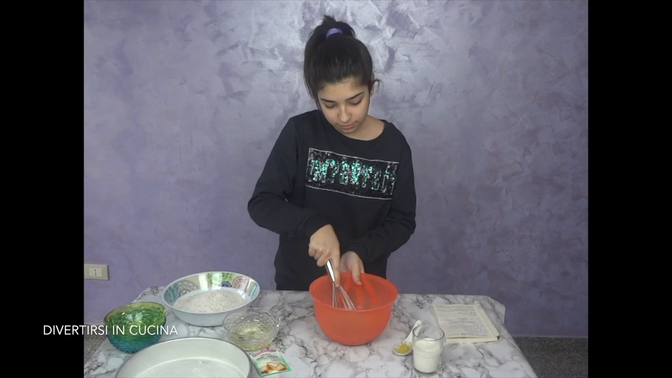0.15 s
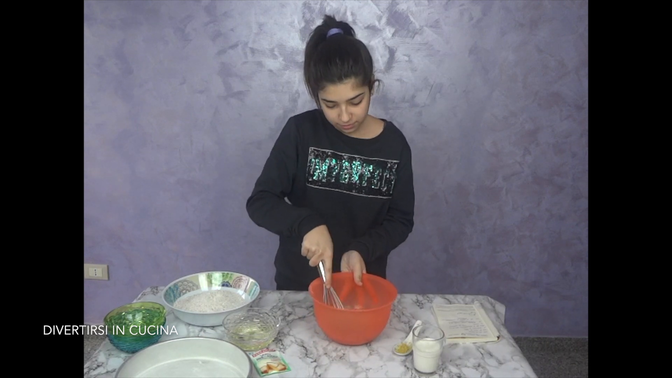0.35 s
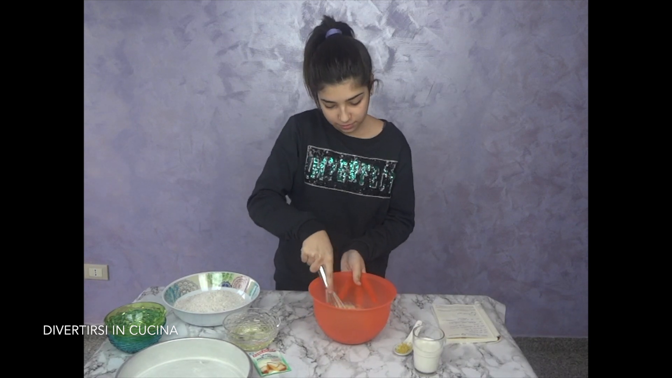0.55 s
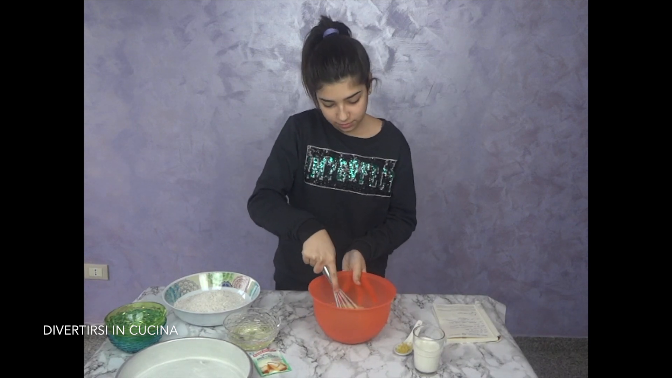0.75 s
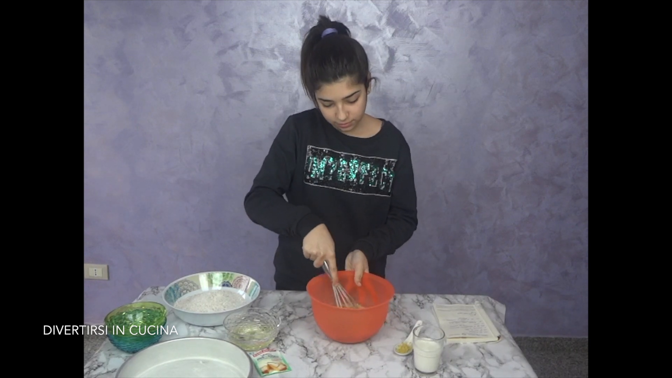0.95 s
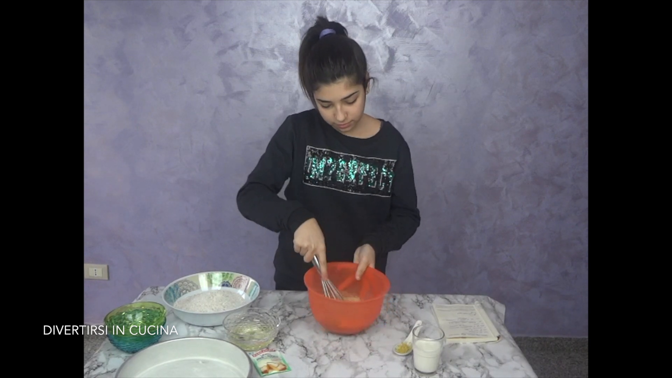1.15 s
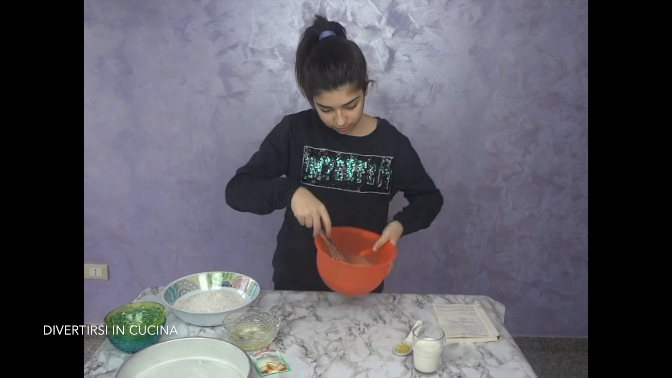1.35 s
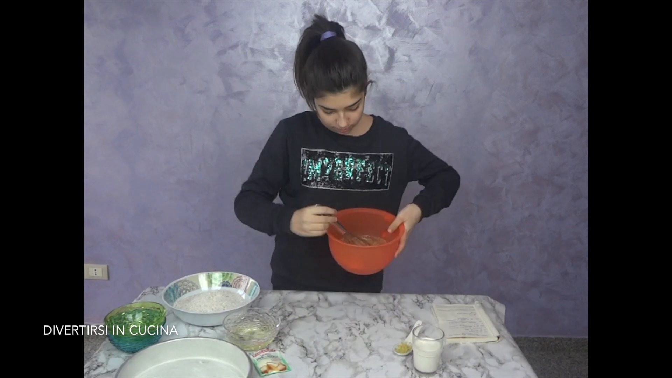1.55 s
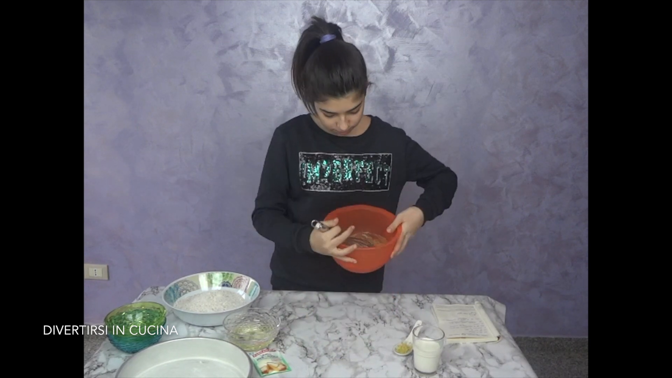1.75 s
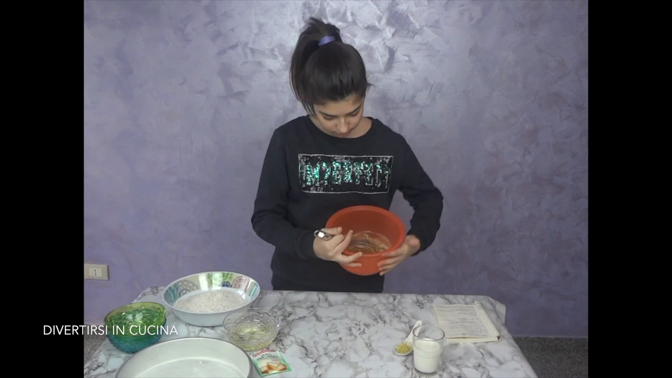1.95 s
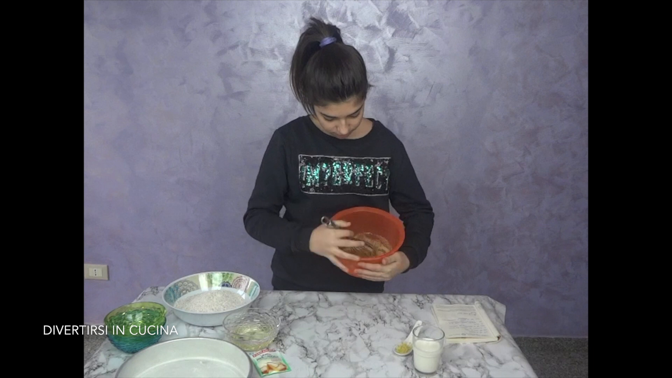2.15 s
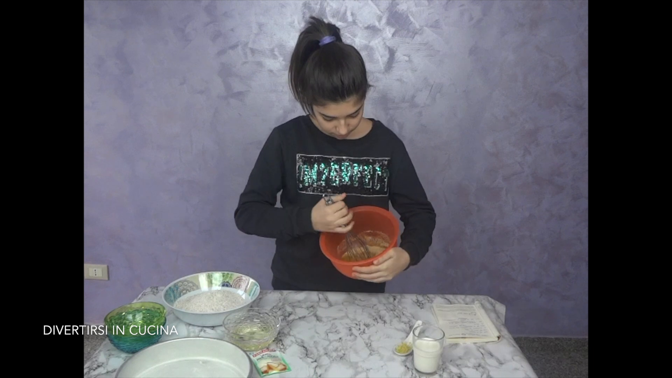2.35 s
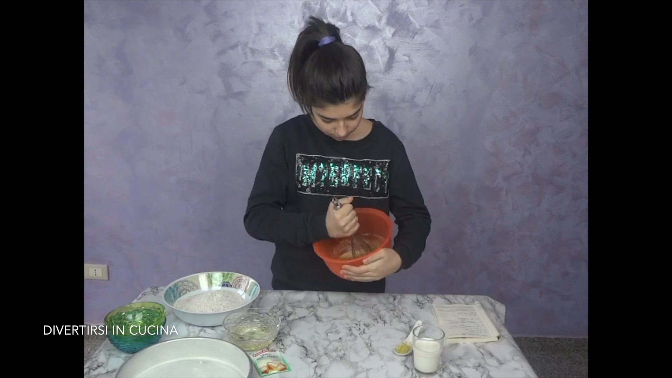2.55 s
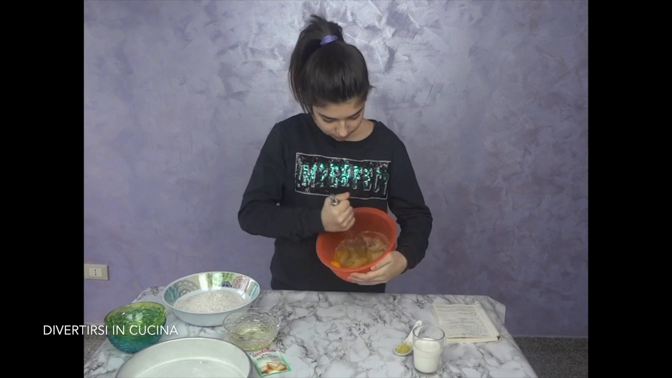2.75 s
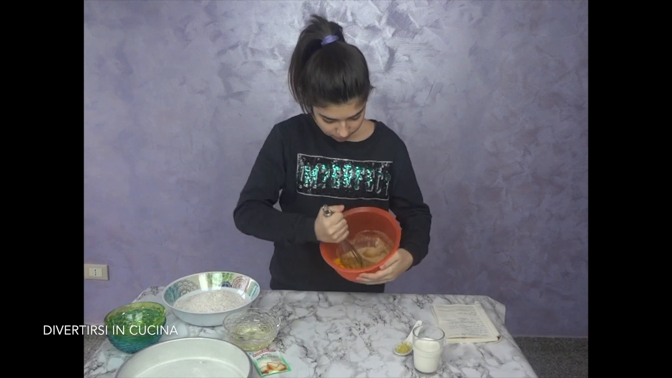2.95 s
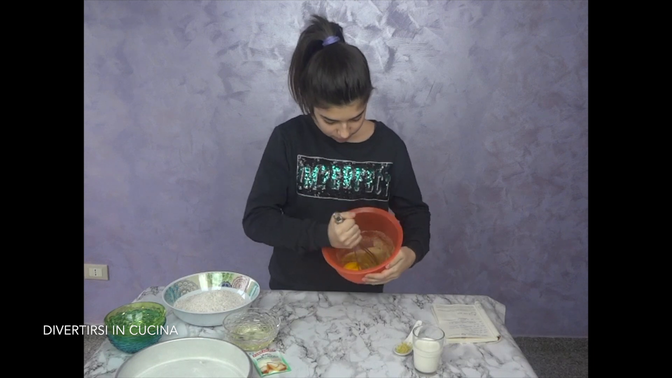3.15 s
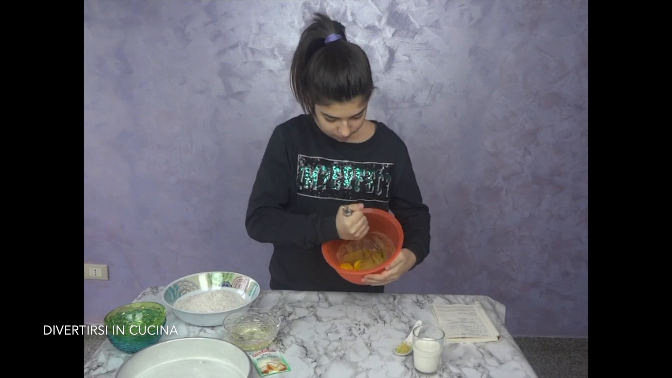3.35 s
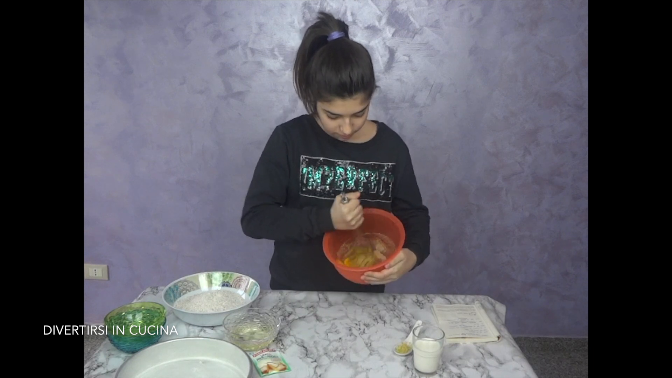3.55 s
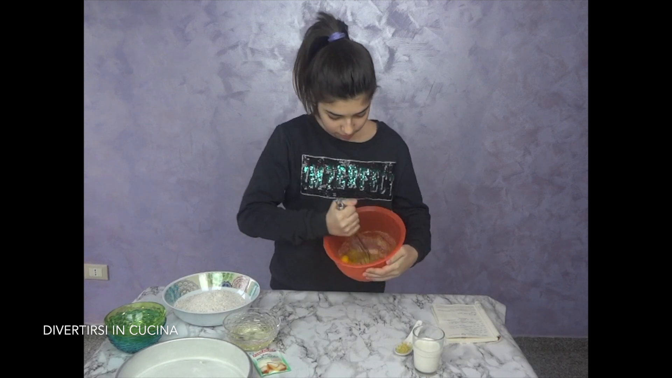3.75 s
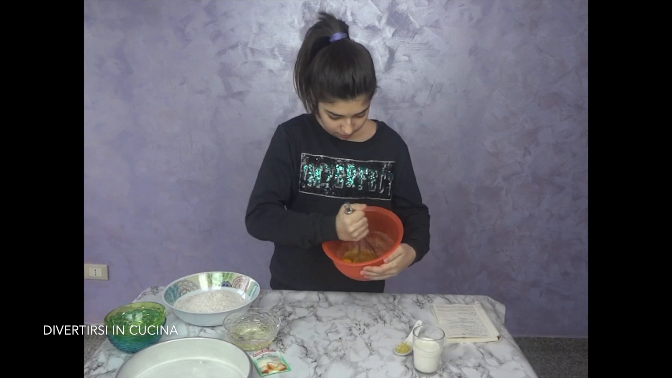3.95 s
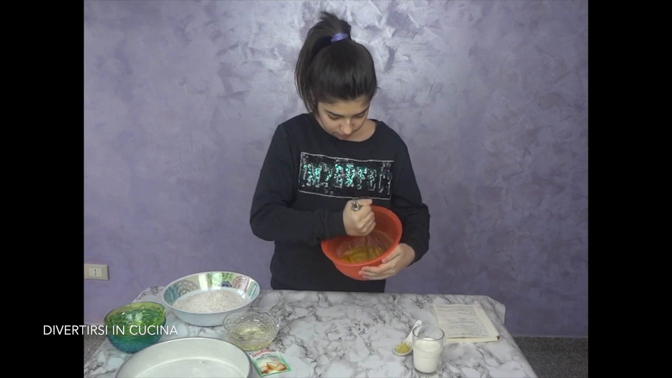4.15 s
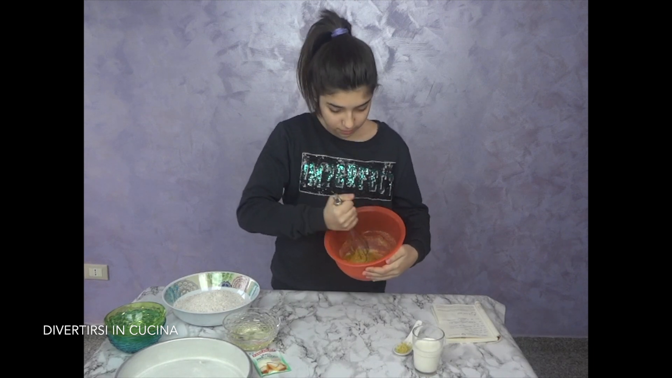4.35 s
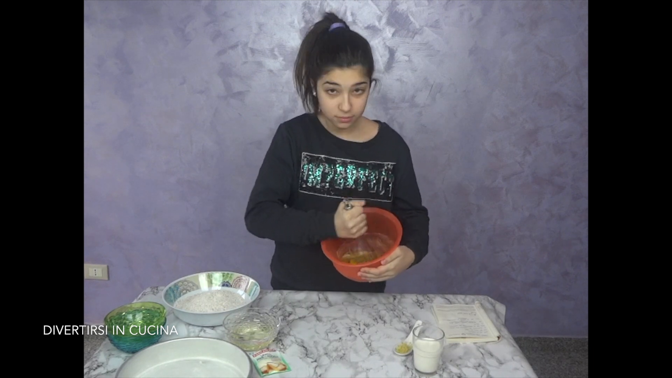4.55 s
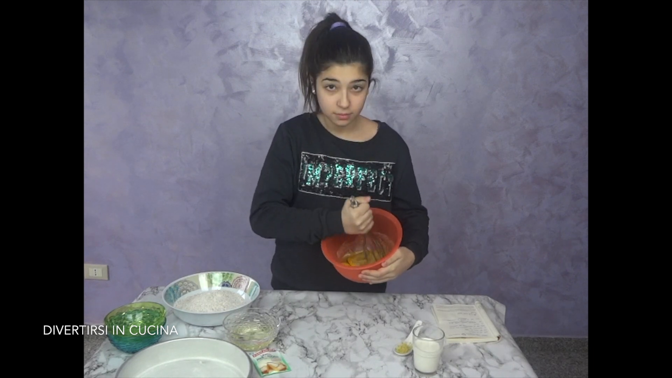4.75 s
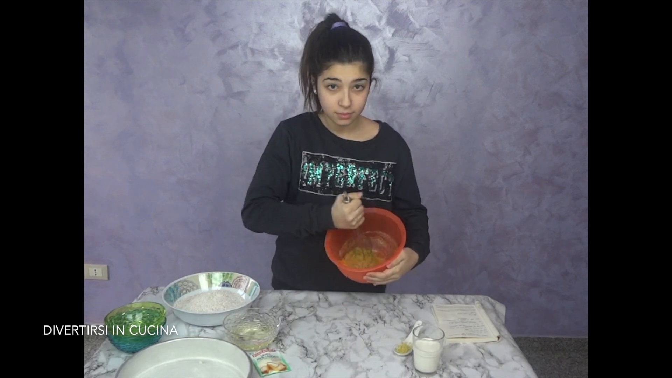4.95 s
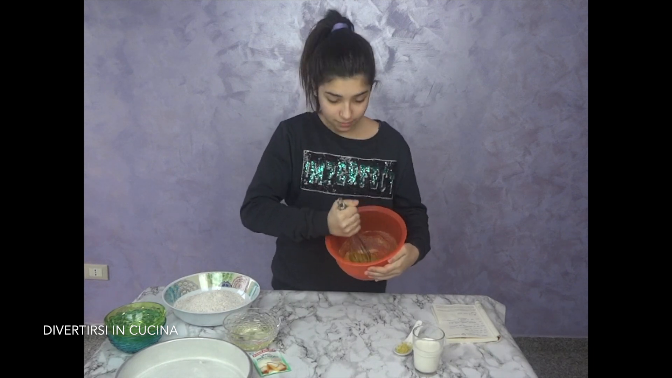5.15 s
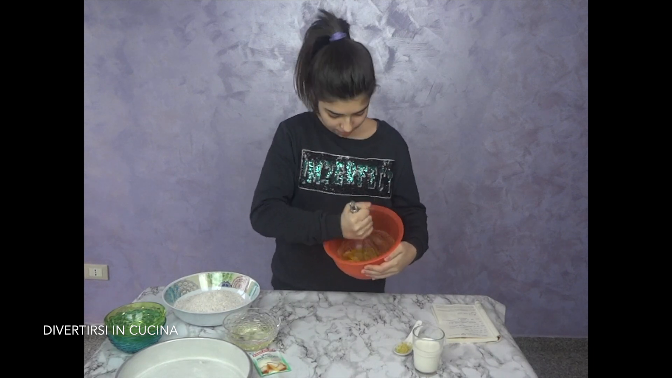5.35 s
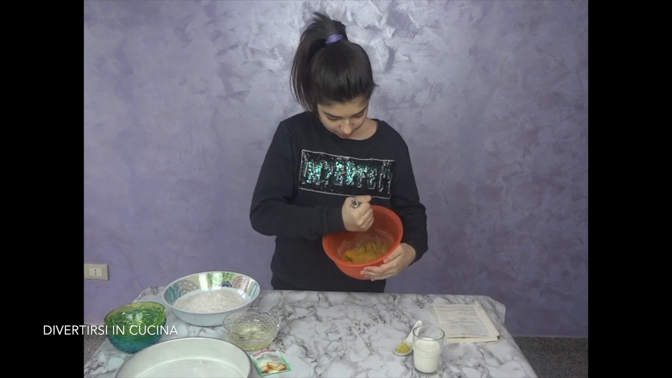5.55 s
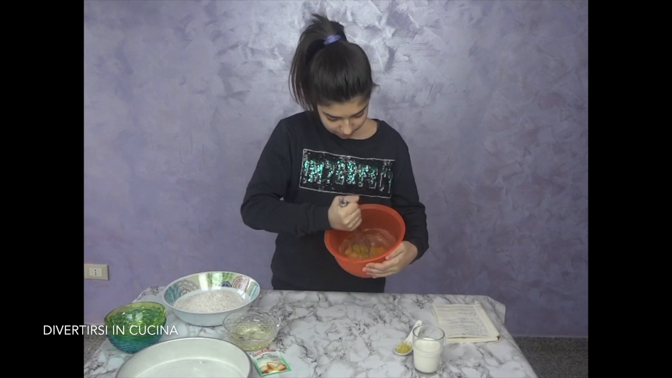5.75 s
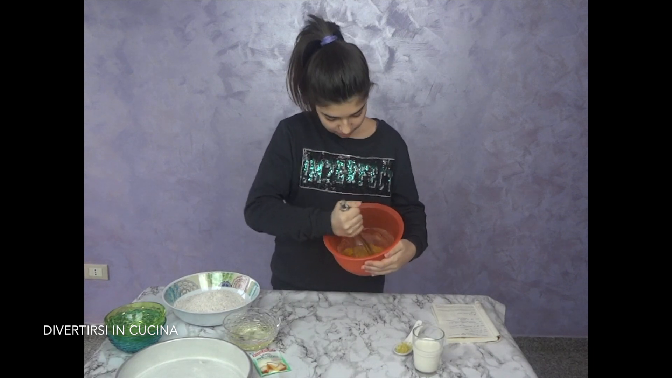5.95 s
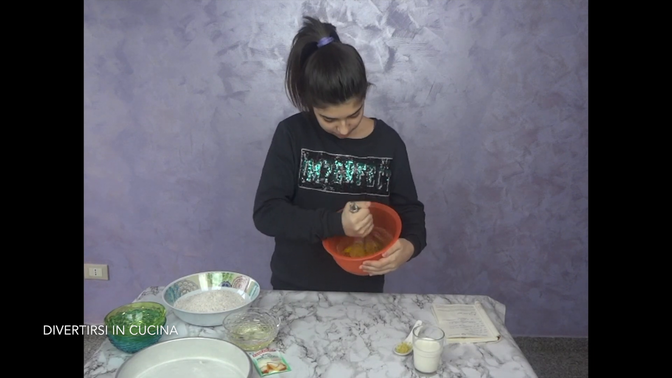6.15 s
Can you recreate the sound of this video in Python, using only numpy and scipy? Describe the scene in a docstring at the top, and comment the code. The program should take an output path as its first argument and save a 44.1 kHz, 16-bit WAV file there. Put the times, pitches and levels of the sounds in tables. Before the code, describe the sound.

A metal wire whisk is already beating eggs in a plastic bowl on a table: from 0 to about 1 second come uneven hard knocks, near 0.05, 0.2, 0.4 and 0.65, with gritty scrapes and a dull table rumble. The scraping dies away and, from about 1.2 to 2.5 seconds, a camera's focus motor gives faint, high, quick chirps, about twenty-five a second, briefly alternating in pitch. Between 1.7 and 2.4 a hand softly knocks and rubs the bowl, with a hissy slide peaking near 2.05. Light whisk touches restart at 2.5 and grow; from 3 to 6.2 beating is regular, about four strokes a second, strongest around 3.6 and 4.1, easing near 4.7, then firm again. The bowl now sounds lower and hollower, with wiry rattle and pings. A short bare-room echo, soft room tone and very faint hum surround it.

```python
"""A wire whisk beats eggs in a plastic bowl in a bare kitchen: blows and gritty scrapes ring bowl, wall and wires.
From the start the table top rumbles dully under the bowl and the room answers, over room tone and a faint hum.
Then a camera's focus motor chirps in quick even steps; the whisk rests while a hand knocks, rubs and slides
on the bowl to shift its grip. Beating resumes with the bowl held in the arm, its drum mode lower."""
import sys
import numpy as np
from scipy import signal
from scipy.fft import rfft, irfft
from scipy.io import wavfile
from scipy.ndimage import uniform_filter1d

SR = 44100
rng = np.random.default_rng(int(sys.argv[2]) if len(sys.argv) > 2 else 0)


def output_pcm(signal):
    """Save a mono or channel-first signal as 16-bit PCM at the path in sys.argv[1].

    Samples are clipped to [-1, 1] before scaling.
    """
    pcm = np.clip(np.atleast_2d(signal).T, -1, 1) * 32767
    wavfile.write(sys.argv[1], SR, np.round(pcm).astype(np.int16))


N = 272979
REGRIP_FROM_S, REGRIP_TO_S = 1.7, 2.4  # the whisk rests while the hand shifts its grip


def amp(db):
    """Amplitude factor of a level in dB."""
    return 10 ** (np.asarray(db) / 20)


def evened(x):
    """Scale to unit rms."""
    return x / np.sqrt(np.mean(abs(x) ** 2) + 1e-20)


def read(points, hz):
    """Interpolate a table over log frequency."""
    point_hz, value = np.transpose(points)
    return np.interp(np.log(hz + 1), np.log(point_hz + 1), value)


def add(mix, start_s, sound):
    """Add a sound in place, cut at the end of the mix."""
    part = mix[round(start_s * SR):][:len(sound)]
    part += sound[:len(part)]


def body(modes, broad):
    """Minimum-phase response of unit energy: ringing modes over a broad spectrum."""
    hz = np.fft.rfftfreq(16384, 1 / SR)
    power = amp(2 * read(broad, hz))
    for mode_hz, width_hz, level_db in modes:
        power = power + amp(2 * level_db) / (1 + (2 * (hz - mode_hz) / width_hz) ** 2) ** 2
    log_gain = np.log(np.r_[power, power[-2:0:-1]]) / 2
    min_phase = np.exp(np.conj(signal.hilbert(log_gain)))
    taps = np.fft.ifft(min_phase).real[:8192]
    return taps / np.linalg.norm(taps)


def through(x, modes, broad):
    """Play a signal through a body."""
    return signal.oaconvolve(x, body(modes, broad))[:N]


def resonate(x, hz, width_hz):
    """Moving resonance that keeps the power of white noise."""
    turn = np.exp(2j * np.pi * np.cumsum(hz) / SR)
    r = np.exp(-np.pi * width_hz / SR)
    base = signal.lfilter([1], [1, -r], x / turn)
    return np.sqrt(2 * (1 - r ** 2)) * (turn * base).real


def grit(per_s, spread_db):
    """Stick-slip: tiny uneven clicks at random times, unit rms."""
    size = amp(spread_db * np.minimum(rng.exponential(1, N), 5))
    clicks = rng.random(N) < per_s / SR
    return evened(size * rng.standard_normal(N) * clicks)


def ring(hz, t60_s, wobble):
    """Mode split into three close partials, so that it beats as it dies."""
    t = np.arange(6000) / SR
    partials = np.sin(2 * np.pi * hz * (1 + wobble[:, None]) * t)
    return amp(-60 * t / t60_s) * partials.mean(0)


def restless(x, patchy_db):
    """As the whisk travels it touches other spots, so modes swell and fade in turn."""
    hz, t, z = signal.stft(x, nperseg=512, noverlap=384)
    patches = rng.standard_normal((len(t), len(hz))).T
    patches = uniform_filter1d(patches, size=3, axis=0)
    patches = evened(uniform_filter1d(patches, size=22, axis=1))
    return signal.istft(z * amp(patchy_db * patches), nperseg=512, noverlap=384)[1][:N]


def fizz_rest_db(s):
    """Resting wires hardly fizz."""
    return -35 * (REGRIP_FROM_S < s < REGRIP_TO_S)


# scrapes along the wall; from REGRIP_FROM_S to REGRIP_TO_S, dull knocks and rubs of the hand gripping the bowl:
# start_s, rise_s, length_s, pressure_db, drum_share_db, wire_share_db, patch_hz
STROKES = [(0.0, 0.0017, 0.081, -21.5, 3.5, -15, 1400), (0.029, 0.029, 0.17, -18, -2, -6, 1040),
           (0.178, 0.0063, 0.17, -22.5, -2.5, -14.5, 1120), (0.258, 0.065, 0.4, -30.5, 3, -6, 1280),
           (0.398, .004, 0.43, -25.5, -2, -7.5, 1206), (.56, 0.018, 0.29, -32.5, -11, -2.5, 1400),
           (0.641, 0.0026, 0.26, -23, -3, -9, 1270), (.8, 0.028, 0.16, -32, 2, -3.5, 1290),
           (0.902, .008, 0.31, -35, 2, -1.5, 1120), (1.025, 0.046, 0.35, -37.5, -5.5, -11.5, 1510),
           (1.735, .004, .17, -32.5, 4.5, -6.5, 1233), (1.918, 0.034, 0.23, -51.5, -3, -14, 1980),
           (2.133, 0.046, 0.2, -43.5, 11, -10, 1225), (2.484, 0.095, 0.8, -41.5, -3.5, -5.5, 1240),
           (2.725, 0.016, 0.33, -37.5, 2.5, -4.5, 1430), (2.79, 0.085, .25, -31, -1.5, -4, 1274),
           (3.041, 0.011, 0.057, -21.5, -7, -7, 1530), (3.056, 0.012, 0.2, -26.5, 5, -9, 960),
           (3.32, 0.0082, 0.28, -26.5, -3.5, -9, 1085), (3.546, 0.058, 0.26, -26, 0.5, -4.5, 1085),
           (3.795, 0.049, 0.25, -30, 4.5, -6.5, 980), (3.913, .02, 0.12, -26.5, 8.5, 0.5, 1120),
           (4.087, 0.02, 0.23, -24, 4, -9, 946), (4.424, 0.027, 0.2, -28.5, 4, -2.5, 1080),
           (4.695, 0.018, 0.18, -30.5, 2, -5.5, 1070), (4.787, 0.01, 0.15, -34.5, 7, -7, 1370),
           (4.997, 0.023, 0.2, -28.5, 5, -7.5, 1670), (5.236, 0.013, 0.33, -35.5, 5, -6.5, 976),
           (5.307, .04, 0.18, -33, 4.5, -8, 1020), (5.518, 0.033, 0.11, -31, -2, -5.5, 943),
           (5.587, 0.021, .17, -33, 3.5, -1.5, 1000), (5.792, 0.025, 0.21, -28.5, -8, -6, 1085),
           (5.866, .02, 0.24, -36.5, -3.5, -6.5, 1250), (6.083, 0.013, 0.23, -25.5, 7.5, -6.5, 1085)]
FADE_DB, FADE_BEND = -22, 1.76  # pressure lost by the end of a stroke, slowly at first
DRUM_FADE, WIRE_FADE, FIZZ_FADE = 1.23, 0.98, 1.29  # how much of that fade each part follows
FIZZ_DB, FIZZ_SLOPE = -2, 1.216  # fizz follows the wire share
DRUM_LAG_S = 0.0057  # extra build-up time of the drum mode
CLIMB = 0.071  # fraction by which patch_hz rises along a stroke, as wires climb the wall


def strokes():
    """Pressure of whisk or gripping hand on drum, wall, wires and fizz, and the moving mode of the wall patch."""
    power = np.zeros((N, 4))
    for start_s, rise_s, length_s, pressure_db, drum_db, wire_db, _ in STROKES:
        t = np.arange(0, 2 * length_s, 1 / SR)[:, None]
        rise_s = np.clip(rise_s, .002, length_s / 2)
        fade_db = FADE_DB * (np.maximum(t - rise_s, 0) / (length_s - rise_s)) ** FADE_BEND
        fade_db = fade_db * [DRUM_FADE, 1, WIRE_FADE, FIZZ_FADE]
        fizz_db = FIZZ_DB + FIZZ_SLOPE * wire_db + fizz_rest_db(start_s)
        share_db = np.array([drum_db, 0, wire_db, fizz_db])
        onset = np.minimum(t / (rise_s + np.array([DRUM_LAG_S, 0, 0, 0])), 1)
        level = amp(pressure_db + share_db + fade_db) * onset
        add(power, start_s, level ** 2)
    t = np.arange(N) / SR
    start_s, _, length_s, *_, hz = np.transpose(STROKES)
    now = np.maximum(np.searchsorted(start_s, t, "right") - 1, 0)
    progress = np.clip((t - start_s[now]) / length_s[now], 0, 1)
    return np.sqrt(power.T), hz[now] * (1 + CLIMB * progress)


# whisk blows; from REGRIP_FROM_S to REGRIP_TO_S, knocks and bumps of the hand on the bowl:
# start_s, level_db, drum_share_db, wire_share_db, snap_db (first tick), ping_hz, ping_db
BLOWS = [(.014, -14, -16, -23, -7, 2860, -36), (.047, -8, -31, -8, 3, 2590, -8),
         (.181, -15, 1.5, -23, 10, 2550, -8), (.397, -11.5, -8.5, -26, 5.5, 2420, -12),
         (0.573, -19, 3.5, -28, 7, 2910, -21), (0.649, -8, -26, -19, 5.5, 2700, -12.5),
         (.902, -27.5, 7.5, -25, 6.5, 3230, -18), (1.671, -38.5, -26, -5, -11, 2360, -7),
         (1.735, -23.5, -12, -8.5, 3, 2400, -19), (1.91, -43, -11, -14, -1, 2300, -4),
         (2.131, -27.5, -1.5, -34, 0, 2700, -10), (2.175, -21.5, -29, -36, -14, 2780, -20),
         (2.23, -32, -30, -41, 2, 2790, -23), (2.28, -42, 13, -32, -14, 3270, -31),
         (2.493, -37, -18, -8.5, -2, 3420, -17), (2.533, -45, 2, -11, -7, 2570, -13),
         (2.752, -36, -14, 5, 13.5, 2780, -6), (2.797, -16, -29, -9.5, 1, 3030, -11),
         (2.842, -30, 7.5, -15, 3, 2860, -24), (2.865, -22, -4.5, -2.5, -14, 2760, -16),
         (3.05, -7, -5.5, -20.5, 1, 2860, -18), (3.33, -6.5, -13, -24, 5.5, 3280, -24),
         (3.549, -25, 1, -16, 7, 3310, -15), (3.572, -3, -21.5, -23, 7.5, 3320, -25),
         (3.613, -8, -14, -10, 7, 4090, -15), (3.824, -16, -12, -22, -4, 2780, -33),
         (3.922, -8.5, -10, -21, -11, 2580, -16), (3.928, -15, -27, -2, 1, 5730, -17),
         (3.958, -13.5, -1.5, -22, -11, 2660, -20), (4.107, 0, -13, -21.5, -2, 2860, -26),
         (4.323, -37, -18, -21, 16.5, 2630, -24), (4.438, -11, -8, -6, -12, 2800, -38),
         (4.49, -27, -26, 1.5, -6, 2870, -22), (4.675, -43, 1, -17, 15, 2560, -24),
         (4.706, -24, -22.5, -11, 9, 3530, -19), (4.714, -23, 2, -6, 7, 2600, -24),
         (4.785, -22.5, -20, 2, -14, 2500, -14), (4.815, -29.5, -4, 8, -22, 3750, -3),
         (5.013, -28, 4.5, 1, 12, 4870, 3), (5.098, -36, 2, -9, 17, 3360, -4),
         (5.253, -24.5, 3, -16, 4, 2590, -12), (5.299, -9, -11, -14, 0, 5400, -24),
         (5.324, -17, -9, -10, 4, 3000, -34), (5.533, -15, -15.5, -18, 3.5, 4260, -24),
         (5.577, -15, -15, -13, 7, 2700, -35), (5.627, -20, -5.5, -14, 7.5, 5590, -2.5),
         (5.812, -17, -3.5, -7, -3, 2940, -10), (5.876, -26, -2.5, -23, -4, 2620, 4),
         (6.1, -9.5, 2.3, -18, -14, 2520, -22), (6.122, -9.5, -8, -11.5, 2, 2540, -14)]
SNAP_AFTER_S = .0015  # from first touch to full contact
SNAP_S = 0.00089  # decay of the snap's spray of ticks, each way
CONTACT_S, BLOW_FIZZ_DB = 0.014, -7.5  # rattle decay; fizz relative to the wire share


def blows(drum, wall, wire, fizz, drum_hz, patch_hz):
    """Whisk blows and hand knocks tick, then rattle: adds to the drives, returns struck notes and snaps."""
    notes, snaps, t = np.zeros(N), np.zeros((2, N)), np.arange(3000) / SR
    noises = rng.standard_normal((len(BLOWS), len(t)))
    for row, noise in zip(BLOWS, noises):
        start_s, db, drum_share_db, wire_share_db, snap_db, ping_hz, ping_db = row
        fizz_share_db = wire_share_db + BLOW_FIZZ_DB + fizz_rest_db(start_s)
        wall_hz = patch_hz[round((start_s + SNAP_AFTER_S) * SR)]
        # in a whisk blow the first wire ticks, the others land and rattle
        tick = amp(db + snap_db) * (np.arange(len(t)) == round(SNAP_AFTER_S * SR))
        rattle = amp(db) * noise * (1 - np.exp(-t / 0.0029)) * np.exp(-t / CONTACT_S)
        spray = amp(db + snap_db) * noise[::-1] * np.exp(-abs(t - SNAP_AFTER_S) / SNAP_S)
        add(drum, start_s, amp(drum_share_db) * (0.51 * rattle + 2.0 * tick))
        add(wall, start_s, amp(-15.5) * (0.66 * rattle + 0.66 * tick))
        add(wire, start_s, amp(wire_share_db) * 0.28 * rattle)
        add(fizz, start_s, amp(fizz_share_db) * 0.35 * rattle)
        add(snaps[0], start_s, amp(wire_share_db) * 2.2 * tick)
        add(snaps[1], start_s, amp(fizz_share_db) * 0.77 * spray)
        # drum note, short dull knock of the giving wall, longer wall note, ping
        knock_db = db + snap_db
        drum_note = ring(drum_hz[round(start_s * SR)], 0.2, 0.045 * noise[6:9])
        add(notes, start_s, amp(knock_db + drum_share_db - 12.0) * drum_note)
        add(notes, start_s + SNAP_AFTER_S, amp(knock_db - 10.0) * ring(wall_hz, 0.013, 0.0039 * noise[:3]))
        add(notes, start_s, amp(db - 20.0) * ring(wall_hz, 0.096, 0.027 * noise[:3]))
        add(notes, start_s, amp(db + ping_db) * ring(ping_hz, 0.04, 0.014 * noise[3:6]))
    return notes, snaps


# broad skirt under the drum mode: freq_hz, level_db_per_hz
DRUM_SKIRT = [(60, -81), (130, -70), (250, -20.5), (400, -15), (750, -31), (1000, -38.5)]


def bowl(drum, drum_hz, gripped):
    """The oval drum mode splits into a close pair; gripped or standing, it is damped and widens."""
    hollow = resonate(drum, 0.934 * drum_hz, 154)
    pair = 0.1 * resonate(hollow, 0.946 * drum_hz, 52) + 0.057 * resonate(hollow, 1.081 * drum_hz, 100)
    damped = 0.065 * resonate(drum, drum_hz + 70, 160) + 0.18 * resonate(drum, drum_hz - 150, 180)
    return pair + gripped * damped + 0.07 * through(drum, [], DRUM_SKIRT)


# modes of wall, low wires, high wires: mode_hz, width_hz, level_db
WALL = [(827, 44, 0.5), (1040, 350, -9), (1245, 94, -3.5), (1700, 430, -3.5), (1970, 235, -3.5)]
WIRES = [(2500, 34, 1), (2680, 250, -5), (2860, 240, -6.5), (3655, 920, -8), (4124, 180, -9.5)]
LOOPS = [(4900, 140, 0), (5600, 640, -3), (5940, 170, -27), (6480, 67, -34), (7080, 20, -37),
         (8500, 110, -15)]
# broad rub of wall, wires, wires damped in the egg, and fizz: freq_hz, level_db_per_hz
WALL_RUB = [(300, -17), (700, -13), (1000, 0), (1600, -9), (2200, -10.5), (3500, -37)]
WIRE_RUB = [(1200, -30), (2000, -6.5), (3200, -10), (4400, -14.5), (6000, -48)]
RESTING_RUB = [(1000, -24), (1600, -6), (2300, 5), (3000, -5), (4000, -16), (6000, -44)]
FIZZ = [(3000, -41), (4500, -3.5), (6000, -3), (8000, -11), (11500, -16.5)]
# loudest wire mode, changing as the whisk turns in the hand: time_s, mode_hz
LOOP = [(0.0, 2740), (0.69, 2730), (0.81, 3040), (1.07, 2730), (1.12, 2960), (1.86, 2550), (2.0, 3030),
        (2.52, 3070), (2.58, 2580), (2.76, 3100), (2.84, 2800), (3.86, 3100), (3.89, 2700), (5.07, 3190),
        (5.27, 2760), (5.36, 3100), (6.1, 2630), (6.19, 3010)]


def wall_and_wires(wall, wire, fizz, snaps, patch_hz, gripped):
    """Wall and wire modes ring over broad rubbing; snaps are too brief to ring the wires."""
    loop_hz = np.interp(np.arange(N) / SR, *np.transpose(LOOP))
    resting = np.zeros(N)
    resting[round(REGRIP_FROM_S * SR):round(REGRIP_TO_S * SR)] = 1
    rings = through(wall, WALL, WALL_RUB) + through(fizz, LOOPS, FIZZ)
    rings += through(wire * (1 - resting), WIRES, WIRE_RUB)
    rings += through(wire * resting, [], RESTING_RUB)
    rings += (0.31 + 0.11 * gripped) * resonate(wall, patch_hz, 91)
    rings += 0.27 * resonate(wire, loop_hz, 210)
    rings = restless(rings, patchy_db=2.5)
    return rings + through(snaps[0], [], WIRE_RUB) + through(snaps[1], [], FIZZ)


# drum mode, high and wandering on the table or gripped, lower in the arm: time_s, mode_hz
DRUM = [(0, 672), (.08, 498), (.17, 559), (.3, 598), (.38, 637), (.41, 539), (.5, 566), (.6, 692),
        (.64, 644), (.655, 518), (.8, 610), (.92, 568), (1.2, 607), (1.76, 513), (1.95, 560), (2.12, 662),
        (2.4, 647), (2.58, 497), (3.33, 507), (3.95, 498), (4.3, 524), (5.0, 491.5), (6.19, 503)]


def whisk_and_grip():
    """Whisk scrapes and blows, and the hand's knocks and rubs, drive the bowl's drum mode, wall and wires."""
    (on_drum, on_wall, on_wire, on_fizz), patch_hz = strokes()
    drum_hz = np.interp(np.arange(N) / SR, *np.transpose(DRUM))
    gripped = np.clip((drum_hz - 510) / 80, 0, 1)  # gripped or standing, the mode sits higher
    catches = grit(700, 2)  # a catch on the wall shakes every part at once
    drum = on_drum * (0.42 * grit(1500, 2.25) + 0.11 * catches)
    wall = on_wall * (0.35 * grit(2500, 2.37) + 0.17 * catches)
    wire = on_wire * (0.61 * grit(3000, 1.3) + 0.17 * catches)
    fizz = on_fizz * (0.63 * grit(4600, 1.0) + 0.21 * catches)
    notes, snaps = blows(drum, wall, wire, fizz, drum_hz, patch_hz)
    rings = wall_and_wires(wall, wire, fizz, snaps, patch_hz, gripped)
    # a small bowl radiates little bass
    high_pass = signal.butter(3, 330, "high", fs=SR, output="sos")
    return signal.sosfilt(high_pass, bowl(drum, drum_hz, gripped) + rings + notes)


# thuds passed into the table top: start_s, level_db
THUDS = [(0, -39), (.18, -43), (.4, -34.5), (.55, -48), (.647, -33.5), (.905, -47)]
THUD_RISE_S, THUD_FADE_DB_PER_S = 0.0086, -170


def table_top():
    """Dull rumble: thuds from the standing bowl push gritty noise through a low, broad body."""
    level, t = np.zeros(N), np.arange(0, .4, 1 / SR)
    for start_s, level_db in THUDS:
        add(level, start_s, amp(level_db + THUD_FADE_DB_PER_S * t) * np.minimum(t / THUD_RISE_S, 1))
    push = level * grit(1500, 2.6)
    return through(push, [], [(40, -42), (120, -11), (260, -5.0), (420, -1.0), (800, -52)])


# reverberation: freq_hz, t60_s
ROOM = [(250, 0.81), (660, 0.52), (1740, 0.48), (4590, 0.53), (10000, 0.51)]
ROOM_DB = -4


def kitchen(x):
    """Sparse random taps, each band dying at its own speed; three path sets take turns as the bowl moves."""
    taps = np.zeros((3, 2, SR))
    at = np.arange(250, SR - 20, 20) + rng.integers(0, 20, (3, 2, (SR - 251) // 20))
    np.put_along_axis(taps, at, rng.choice([-1., 1.], at.shape), 2)
    hz, t, z = signal.stft(taps, SR, nperseg=256)
    decay = amp(-60 * t / read(ROOM, hz)[:, None])
    tails = signal.istft(z * decay, SR, nperseg=256)[1]
    tails = tails / np.linalg.norm(tails[0, 0])
    phase = .6 * np.arange(N) / SR + np.arange(3)[:, None, None] / 3
    turns = np.sqrt(2 / 3) * np.cos(np.pi * phase)
    return signal.fftconvolve(turns * x, tails, axes=2).sum(0)[:, :N]


# room tone: freq_hz, level_db_per_hz
HUSH = [(15, -20), (40, -3), (70, -10.5), (120, -5), (250, -3.5), (500, -4.5), (1000, -9), (2500, -13.5),
        (5000, -17.5), (11500, -26)]
HUSH_DB = -59
# hum: freq_hz, level_db (rms)
HUM = [(200, -80)]


def hush():
    """Room tone as shaped noise on both channels, plus a faint sine hum."""
    noise = signal.oaconvolve(rng.standard_normal((2, N)), body([], HUSH)[None])[:, :N]
    t = np.arange(N) / SR
    hum = sum(amp(db) * np.sqrt(2) * np.sin(2 * np.pi * hz * t) for hz, db in HUM)
    return amp(HUSH_DB) * noise + hum


# focus motor level: time_s, level_db
FOCUS = [(1.2, -65), (1.45, -66), (1.62, -72), (1.92, -61), (2.2, -62), (2.52, -67), (2.56, -93)]
FRAME_S, FRAME_AT_S = .0399, 1.237  # one chirp a frame
FOCUS_HZ, HUNT_HZ = 4760, 397  # while it hunts, chirps step above and below in turn
HUNT_FROM_S, HUNT_TO_S = 1.3, 1.66


def focus_motor():
    """A short sine whine in every frame, quick to start and slower to end."""
    time_s, level_db = np.transpose(FOCUS)
    t = np.arange(N) / SR
    frame, since_s = np.divmod(t - FRAME_AT_S, FRAME_S)
    hunting = (t > HUNT_FROM_S) & (t < HUNT_TO_S)
    hz = FOCUS_HZ + HUNT_HZ * (1 - 2 * (frame % 2)) * hunting
    gate = np.e * since_s / 0.0027 * np.exp(-since_s / 0.0039)
    level = amp(np.interp(t, time_s, level_db, left=-150, right=-150))
    return level * gate * np.sin(2 * np.pi * np.cumsum(hz) / SR)


# hand sliding over the bowl: time_s, level_db
SLIDE = [(1.8, -66), (1.814, -74), (1.826, -69), (1.91, -53.5), (2.046, -43.5), (2.104, -50.5),
         (2.202, -72), (2.3, -87)]
# what the slide rings: mode_hz, width_hz, level_db
SLIDE_MODES = [(2120, 180, 2.5), (3280, 200, -3), (5190, 1000, -13)]
# hiss under it: freq_hz, level_db_per_hz
SLIDE_HISS = [(1200, -37), (1900, -10), (3000, -4.5), (6000, -11), (8000, -17.5), (11500, -23)]


def hand_slide():
    """Skin rubs on plastic: dense grit rings a few modes over hiss."""
    time_s, level_db = np.transpose(SLIDE)
    level = amp(np.interp(np.arange(N) / SR, time_s, level_db, left=-120, right=-120))
    return through(level * grit(8300, 1.0), SLIDE_MODES, SLIDE_HISS)


def scene():
    """Channel 0 is what both microphone ports share, channel 1 what reaches the right one otherwise."""
    dry = whisk_and_grip() + table_top() + hand_slide()
    direct = dry * np.array([[1], [.35]])
    return direct + amp(ROOM_DB) * kitchen(dry) + hush() + focus_motor()


# port colour: freq_hz, left_minus_right_db
LEAN = [(60, 0), (110, -0.5), (190, -3), (350, -2.5), (620, -4), (1110, -9), (1990, -8), (3560, -4.5),
        (6380, -2), (11400, 0)]
# port phase lead: freq_hz, left_lead_rad
LEAD = [(0, 0.17), (950, -0.066), (1640, 0.37), (4220, 0.56), (11600, 0.5)]
# port likeness: freq_hz, shared_fraction (amplitude)
SAME = [(60, 0.9), (170, 0.36), (490, 0.91), (1400, 0.38), (4000, 0.79), (11400, 0.82)]
EDGE_HZ = 11150


def record(dry):
    """A close pair of ports with unequal colour and a small phase lead, then the band limit."""
    hz = np.fft.rfftfreq(N, 1 / SR)
    common, other = rfft(dry)
    same = np.clip(read(SAME, hz), 0, 1)
    lean = amp(read(LEAN, hz) / 2)
    right = same * common + np.sqrt(1 - same ** 2) * other
    right = right * np.exp(-1j * read(LEAD, hz))
    pair = irfft(np.array([common * lean, right / lean]), N)
    low_pass = signal.firwin(511, EDGE_HZ, window=("kaiser", 9), fs=SR)
    return signal.oaconvolve(pair, low_pass[None], "same")


dry = scene()
out = record(dry)
output_pcm(out)
```